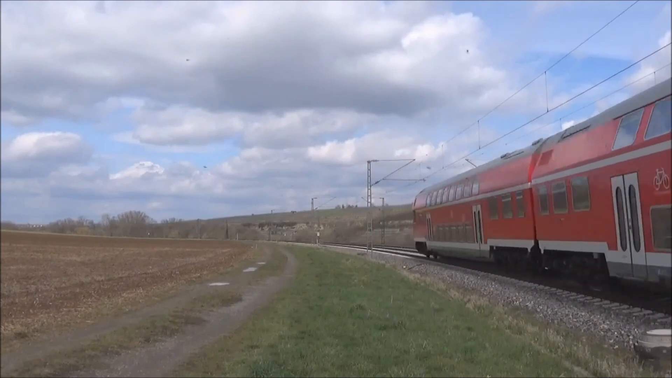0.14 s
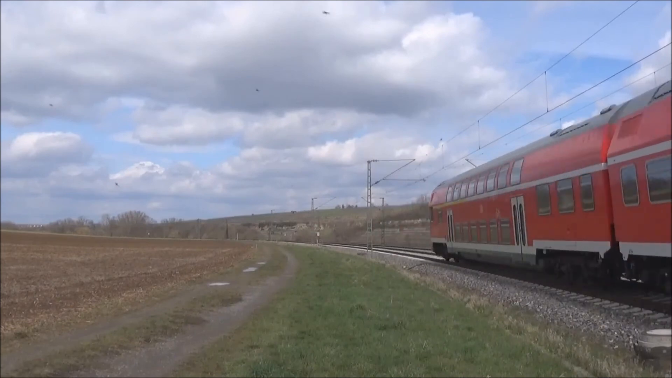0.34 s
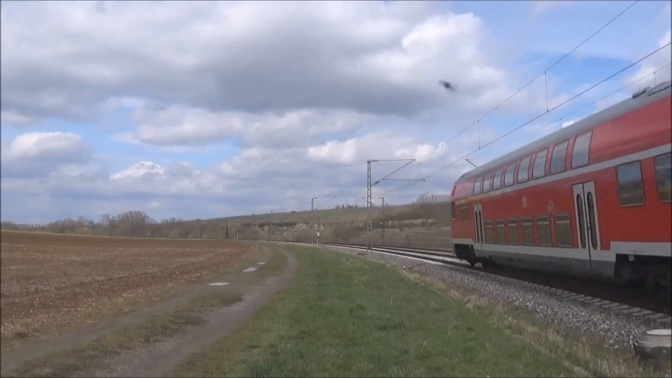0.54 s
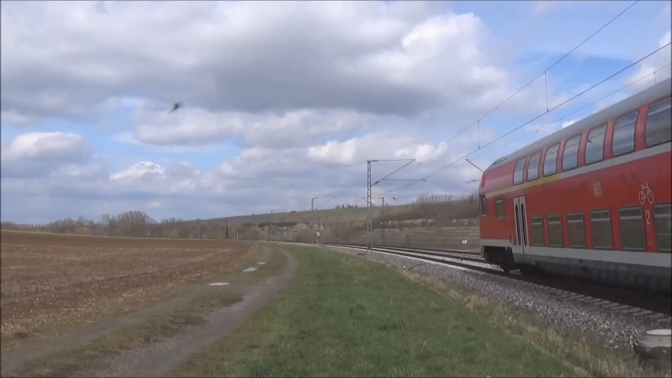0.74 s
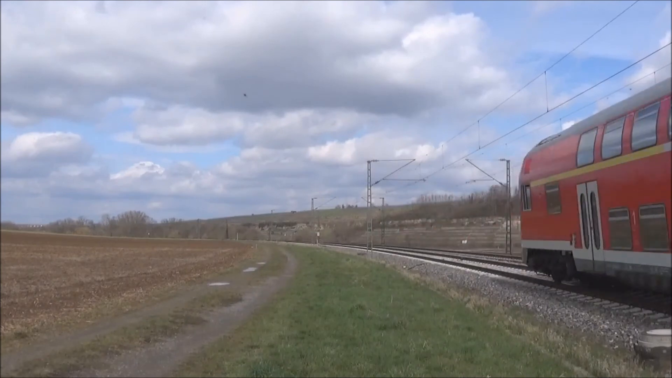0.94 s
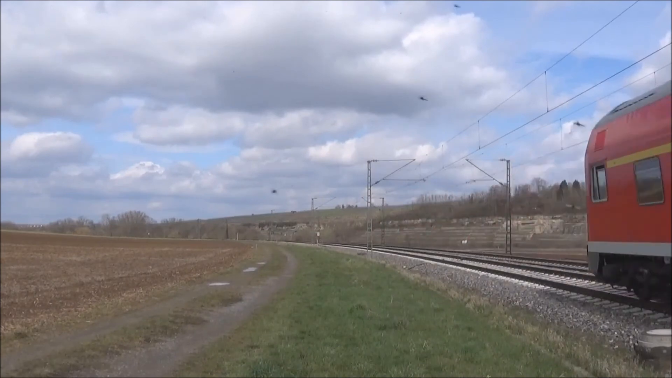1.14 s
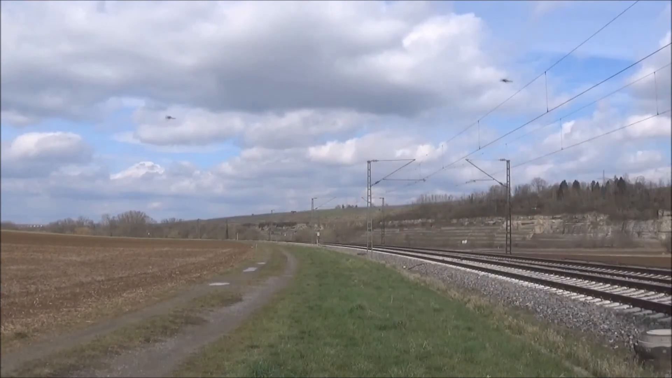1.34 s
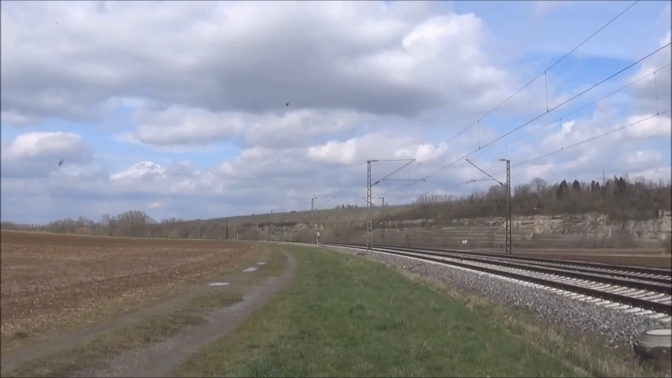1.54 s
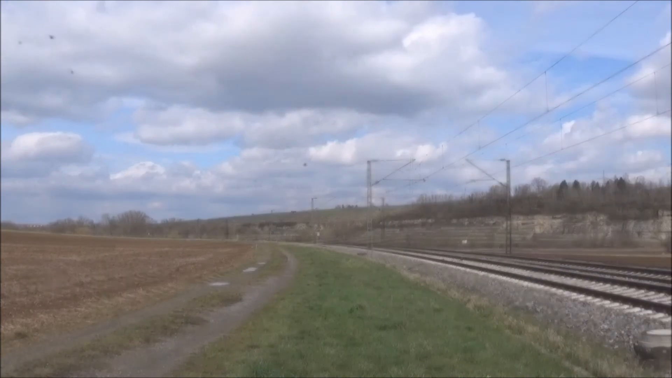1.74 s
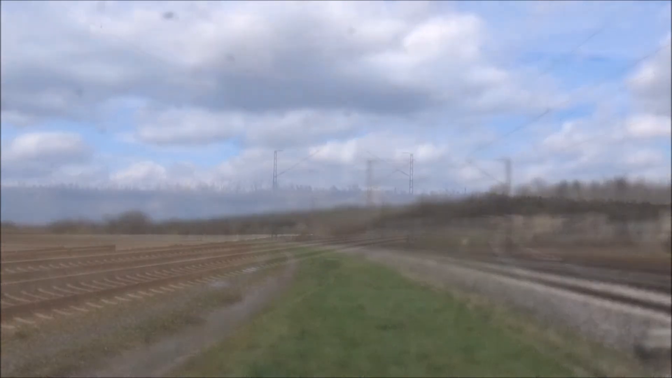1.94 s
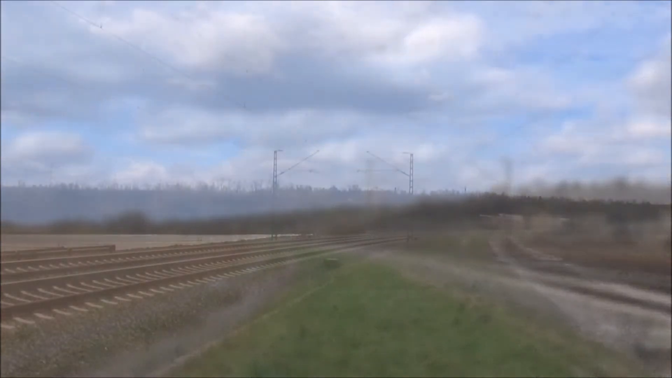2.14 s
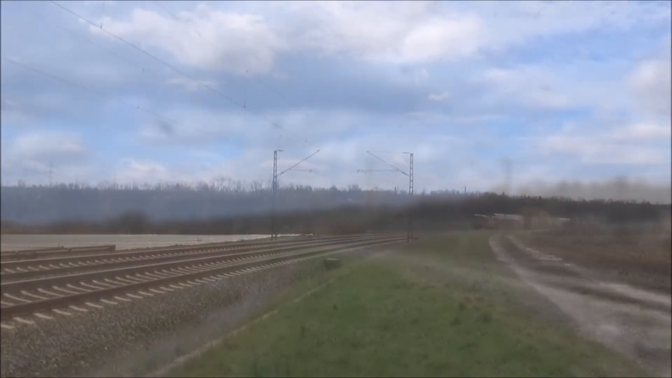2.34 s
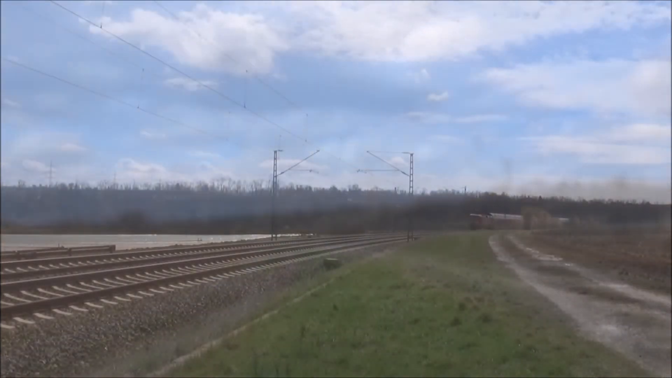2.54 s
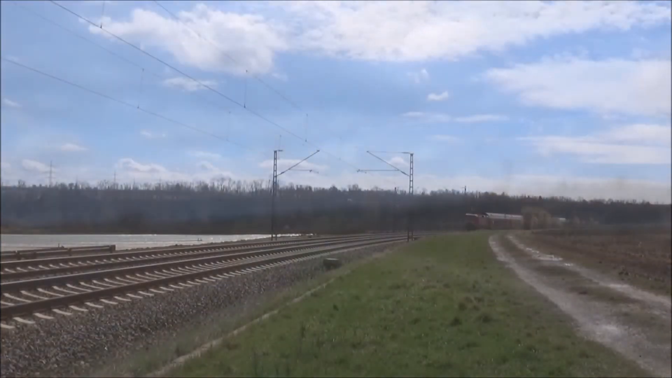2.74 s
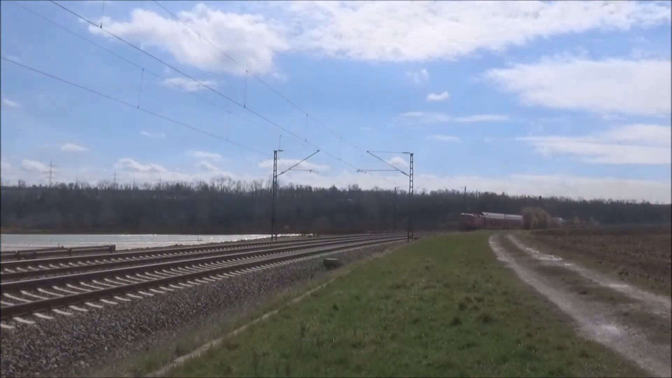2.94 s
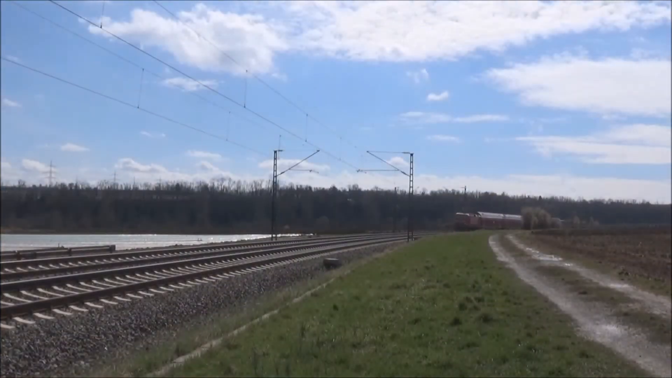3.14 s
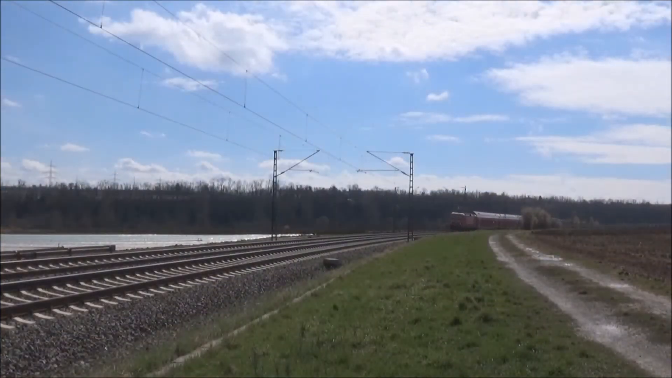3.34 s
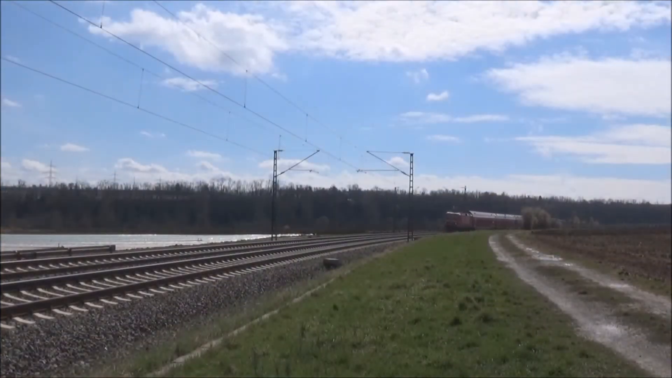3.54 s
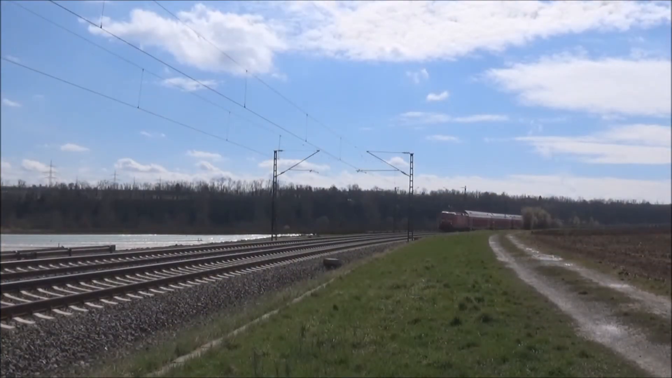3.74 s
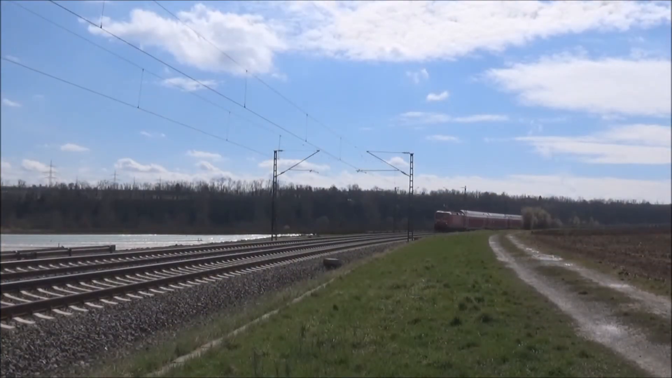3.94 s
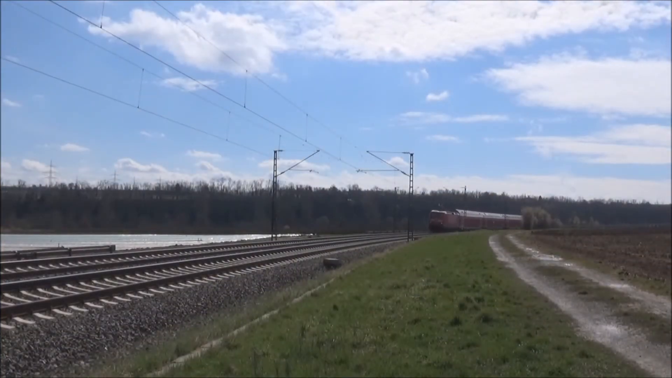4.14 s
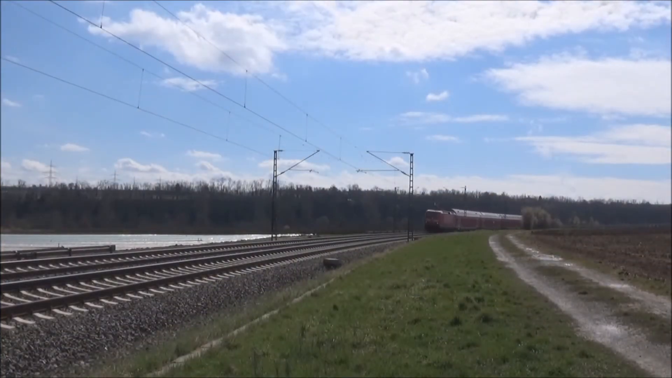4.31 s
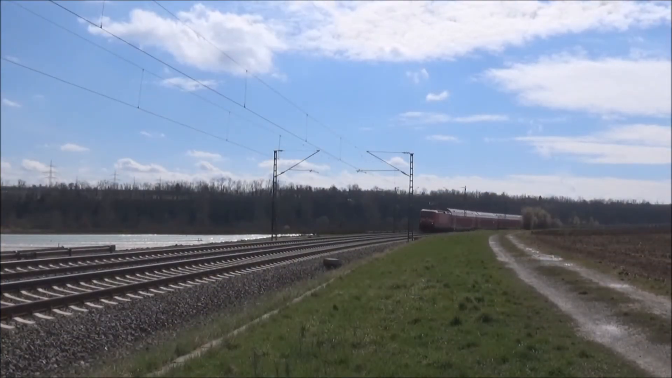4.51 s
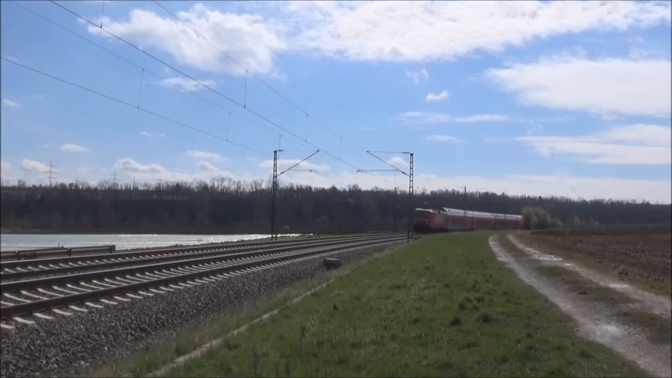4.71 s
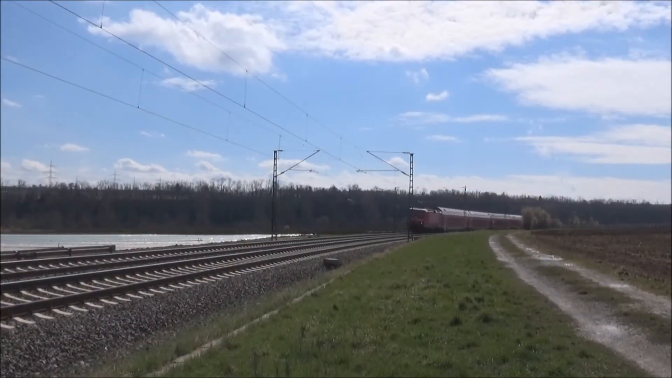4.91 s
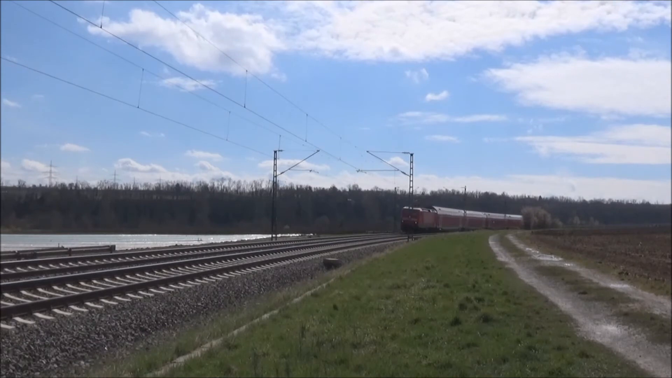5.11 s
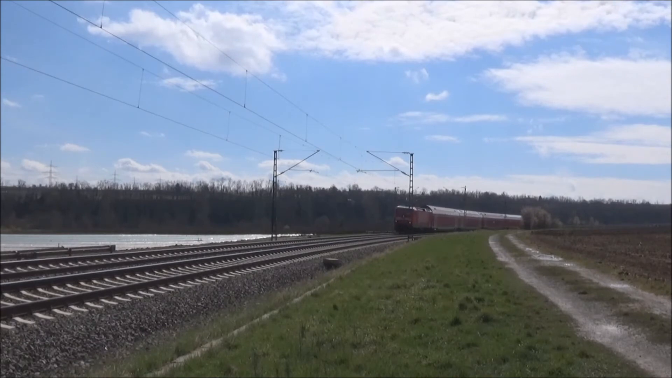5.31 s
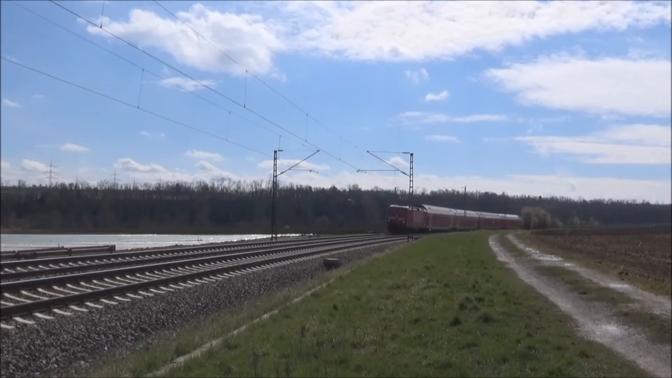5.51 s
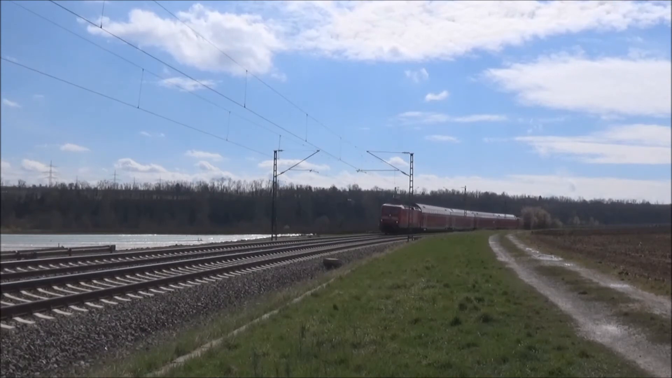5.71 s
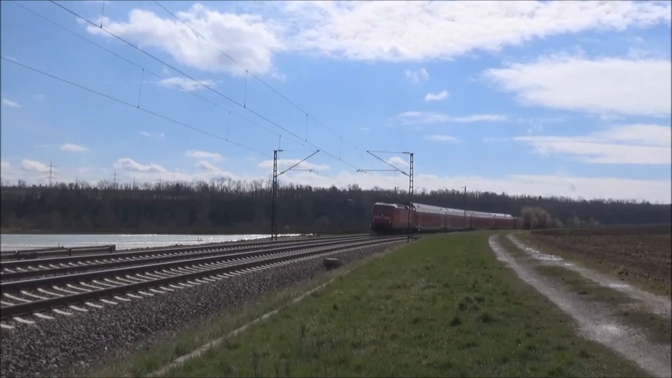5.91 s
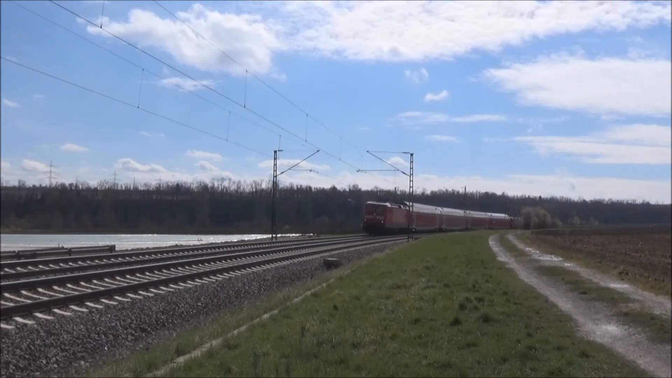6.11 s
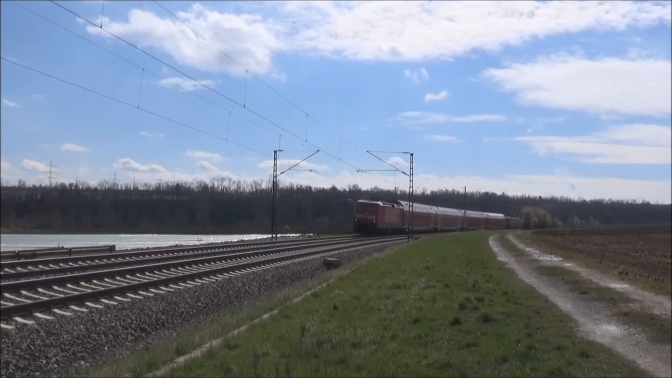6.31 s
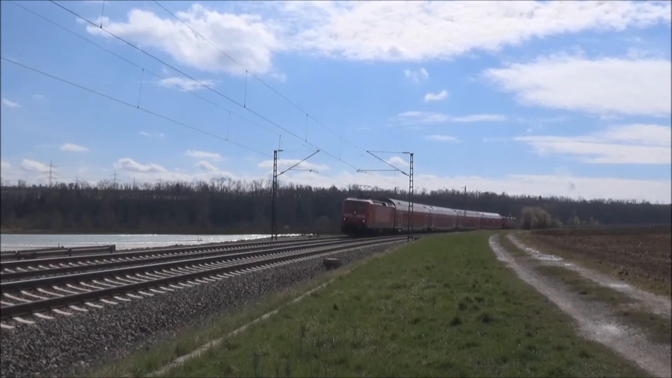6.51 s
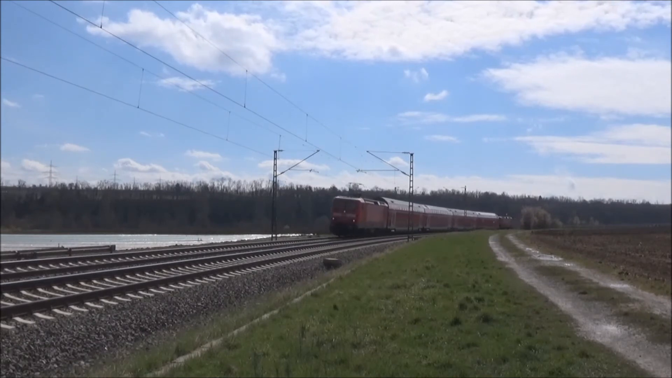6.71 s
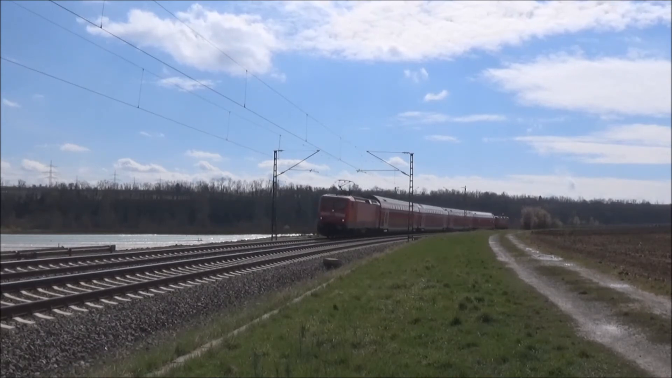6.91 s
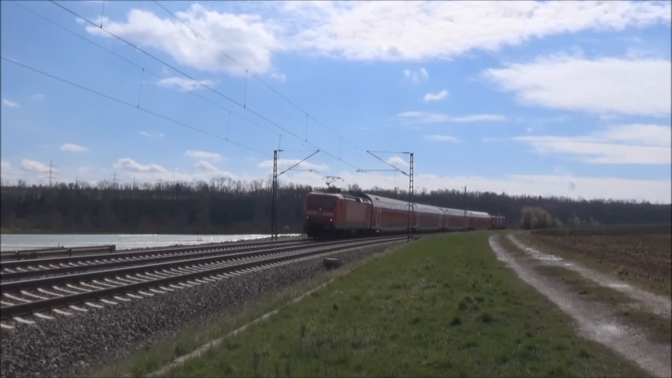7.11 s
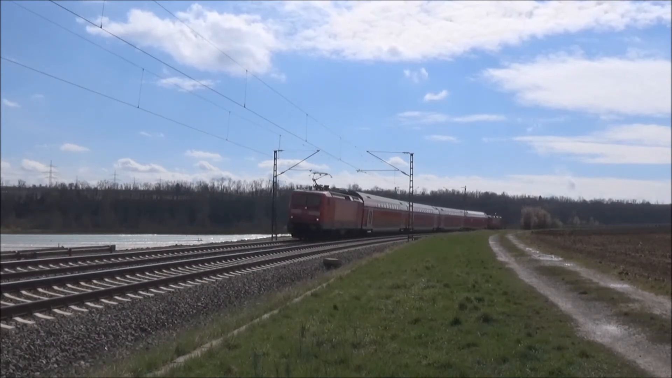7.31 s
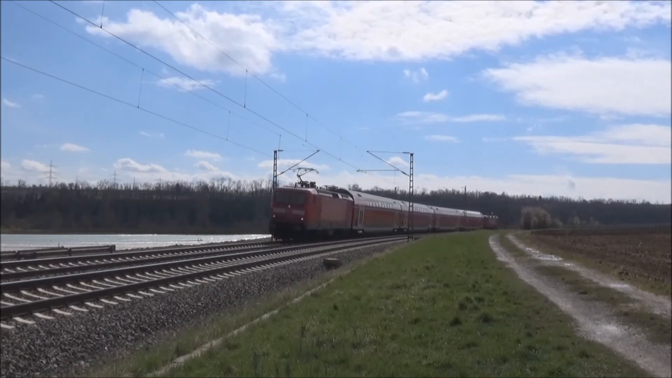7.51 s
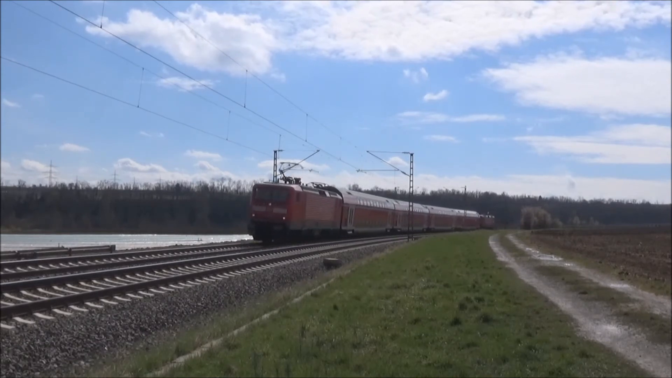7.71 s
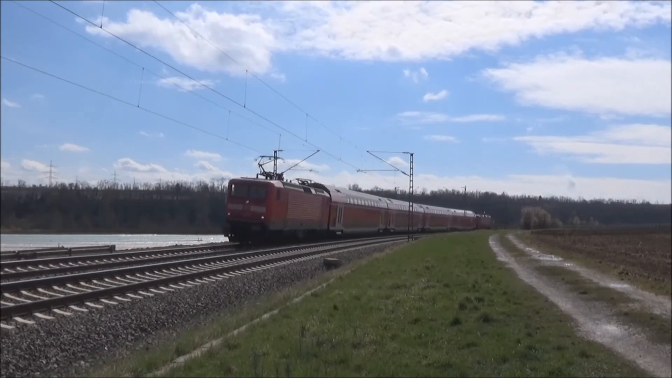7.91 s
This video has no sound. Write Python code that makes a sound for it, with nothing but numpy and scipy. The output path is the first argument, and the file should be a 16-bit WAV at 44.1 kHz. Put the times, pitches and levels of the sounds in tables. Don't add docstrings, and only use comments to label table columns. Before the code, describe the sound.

A passenger train rolls past close on the right, with a broad roar, wheel hiss and falling whine. Its tail recedes, a flat wheel thumping quickly. Quiet open land follows, then wind buffets the camera's stereo microphone while rails sing and chirp. A high metallic squeal takes hold, a stone snaps, and a second train's distant roar slowly grows.

```python
import sys
import numpy as np
from scipy import signal
from scipy.fft import rfft, irfft, next_fast_len
from scipy.io import wavfile
from scipy.ndimage import uniform_filter1d, map_coordinates

SR = 44100
rng = np.random.default_rng(int(sys.argv[2]) if len(sys.argv) > 2 else 0)


def inscribe(sig):
    pcm = np.round(np.clip(np.atleast_2d(sig).T, -1, 1) * 32767)
    wavfile.write(sys.argv[1], SR, pcm.astype(np.int16))


def how_loud(loudness_db):
    steps = np.asarray(loudness_db, float) / 20
    return 10 ** steps


N = 350595
SIZE = next_fast_len(N + 8192)
HZ = np.fft.rfftfreq(SIZE, 1 / SR)
T = np.arange(N) / SR


def unit(x):
    return x / np.sqrt(np.mean(x ** 2) + 1e-20)


def along(points):
    f, *cols = np.transpose(points)
    return [np.interp(np.log(HZ + 1), np.log(f), c) for c in cols]


def curves(rows):
    s, *cols = np.transpose(rows)
    return [np.interp(T, s, c) for c in cols]


def fade(start, end):
    return np.clip((T - start) / (end - start), 0, 1)


def swells(rows):
    return sum(np.c_[list(dbs)] * np.exp(-((T - s) / half) ** 2) for s, half, *dbs in rows)


def wobble(rate):
    return map_coordinates(rng.standard_normal(int(N * rate / SR) + 4), [np.arange(N) * rate / SR])


def filtered(x, gain):
    return irfft(rfft(x, SIZE) * gain, SIZE)[:, :N]


def patchy(patchy_db, bins):
    z = signal.stft(rng.standard_normal((2, N + 512)), nperseg=512)[2]
    patches = uniform_filter1d(rng.standard_normal(z.shape[1:]), bins, 0)
    patches = unit(uniform_filter1d(patches, 8, 1))
    noise = signal.istft(z * how_loud(patchy_db * patches), nperseg=512)[1]
    return rfft(noise[:, :N], SIZE)


def placed(pair, gain, pan_db, alike, lead):
    turn = np.arccos(np.clip(alike, -1, 1)) / 2
    mid = pair[0] * gain * np.cos(turn)
    side = pair[1] * gain * np.sin(turn)
    tilt = how_loud(pan_db / 2) * np.exp(.5j * lead)
    x = irfft(np.array([(mid + side) * tilt, (mid - side) / tilt]), SIZE)[:, :N]
    return x / np.std(x.mean(axis=0))


def rush(spectrum, sides, patchy_db):
    return placed(patchy(patchy_db, bins=6), how_loud(along(spectrum)[0]), *along(sides))


def singing(centres, bands, alike, patchy_db):
    width, db, pan_db, lead = np.transpose(bands)[:, :, None]
    power = how_loud(2 * db) / width / (1 + ((HZ - np.c_[centres]) / width) ** 2 / 2) ** 3
    total = power.sum(axis=0)
    share = power / total
    pan_db, lead = (share * pan_db).sum(axis=0), (share * lead).sum(axis=0)
    return placed(patchy(patchy_db, bins=3), np.sqrt(total), pan_db, alike, lead)


def bursts(events, hz, length, delay):
    x = np.zeros(N)
    for (s, db), (bend, phase) in zip(events, rng.standard_normal((len(events), 2))):
        near = slice(round(s * SR) - 2000, round(s * SR) + 3000)
        u = T[near] - s - delay
        tone = np.sin(2 * np.pi * hz * (1 + 0.011 * bend) * u + phase)
        x[near] += how_loud(db) * np.exp(-(u / length) ** 2) * tone
    return x


# f/Hz, level/dB (per Hz)
FIELD = [(30, -30), (70, -2), (120, -1), (200, -4), (320, 3), (450, -12), (555, -5.5), (700, -15),
         (1200, -33)]
# f/Hz, left-right level/dB, likeness, left lead/rad
FAR_SIDE = [(60, -3, 0.93, 0), (500, 1.5, 0.98, 0), (3000, 0, 0.88, 0.0052), (6860, 3, 0.45, 0),
            (9450, -6, 1, 0), (11000, -3, 0.98, 0)]


def field():
    x = how_loud(-52 + 1.3 * wobble(4.7)) * rush(FIELD, FAR_SIDE, patchy_db=1.5)
    deep = filtered(x, 1 / (1 + (HZ / 170) ** 4))
    lull_db = swells([(3.2, 0.2, -8)])[0]
    purr = how_loud(-64) * (1 - fade(3.4, 3.6)) * singing([560], [(14, 0, 1, 0)], alike=.9, patchy_db=0.0)
    return x + (how_loud(lull_db) - 1) * deep + purr


# t/s, half length/s, f/Hz, glide/(Hz/s), level/dB
WHINE = [
    (.3, 0.64, 1400, -230, -30.5),
    (.75, 0.36, 1500, -200, -36),
    (.58, 0.18, 690, -150, -32),
    (1.3, 0.2, 715, -82, -29.5),
]


def whine():
    x = np.zeros(N)
    rough = wobble(69.94) + 1j * wobble(70.3)
    for s, half, hz, glide, db in WHINE:
        near = slice(max(round((s - 3 * half) * SR), 0), round((s + 3 * half) * SR))
        u = T[near] - s
        tone = np.exp(2j * np.pi * (hz + glide * u / 2) * u)
        x[near] += how_loud(db - (u / half) ** 2 * 7.9) * np.real(rough[near] * tone)
    return x


# t/s, peak level/dB
THUMPS = [(1.765, -18), (1.867, -30), (1.97, -18), (2.073, -17.5), (2.176, -18.5), (2.281, -21),
          (2.383, -25.5), (2.477, -28), (2.585, -28), (2.689, -32), (2.793, -34), (2.884, -43.5)]


def flat_wheel():
    flat = np.array(THUMPS) - [0, 2.5]
    ground = bursts(flat, hz=170, length=0.01, delay=0.0344)
    ground += bursts(flat, hz=173, length=0.021, delay=0.069)
    knock = bursts(flat, hz=223, length=0.0055, delay=0.0081)
    click = bursts(flat, hz=347, length=0.0048, delay=0.00696)
    return how_loud(-12.5) * ground + knock + how_loud(-11) * click


# f/Hz, level/dB (per Hz)
BOGIE = [(40, -34), (80, -13.5), (180, 1.5), (400, -2.5), (700, -5.5), (1400, -30.5)]
RAIL = [(300, -20), (600, 1.5), (750, -1), (900, 2.5), (1350, 2.5), (1600, -4), (2300, -28.5)]
WHEEL = [(1200, -28), (1750, 0.5), (2300, 1), (2550, -3), (2800, 0.5), (3200, -3), (4200, -26)]
RUSH = [(2400, -19), (3500, 0), (5000, 0), (6000, 0.5), (7000, -4.5), (8500, -20), (10000, -36)]
AIR = [(5500, -26), (7500, 5.5), (9000, 1.5), (10500, -3), (11000, -25)]
# f/Hz, left-right level/dB, likeness, left lead/rad
NEAR_SIDE = [(60, 1.5, .85, 0.17), (204, -3.5, 0.91, 0.11), (770, -12, 0.69, -0.38), (1790, -9, 0.4, 1),
             (3470, -4.5, 0.71, 0.87), (6000, -4, 0.69, 0.18), (8300, -5, 0.39, 0.13),
             (9500, 4.5, 0.62, -.3), (10800, 0, 1, 0.07)]
# t/s, loss/dB
FADING = [(0.0, -1), (.4, 0), (1.45, -1), (1.85, -4.5), (2.15, -11.5), (2.35, -20), (2.6, -24.5),
          (2.85, -30.5), (3.3, -38)]
# level alongside/dB, share of the loss, lead/s, sag/(dB/s) once the last car nears
PARTS = [
    (-22.5, 1.09, .001, 0.3),
    (-21, 0.7, .001, 8),
    (-24.5, 0.95, 0.23, 7),
    (-26, 1.05, 0.2, 0.5),
    (-37, 0.8, 0.15, 1),
]
# t/s, half length/s, bogie level/dB, wheel level/dB, rush level/dB
AXLES = [
    (.2, .1, 1.5, -2, -1),
    (.4, 0.11, -3.2, -1.5, 0),
    (.68, 0.25, -0.7, 1.5, 0.5),
    (1.28, 0.11, 1, -1, 0.9),
    (1.46, 0.11, -0.1, 4, 1.8),
    (1.62, .06, -0.2, 1, -1.5),
    (1.8, 0.11, 0, 1.2, 2),
]


def passing():
    last_car_s, tail_s = 0.64, 1.53
    sagging = np.clip(T, last_car_s, tail_s) - last_car_s
    loss_s, loss_db = np.transpose(FADING)
    bogie_db, rail_db, wheel_db, rush_db, hiss_db = [
        db + share * np.interp(T + lead, loss_s, loss_db) - sag * sagging for db, share, lead, sag in PARTS]
    heavy_db, bright_db, blow_db = swells(AXLES)
    flutter_db = 1.5 * np.exp(-((T - 0.68) / 0.28) ** 4) * np.cos(2 * np.pi * 10.6 * (T - .78))
    blow_db = blow_db + flutter_db
    shake = wobble(13.63)
    x = how_loud(bogie_db + heavy_db + .5 * shake) * rush(BOGIE, NEAR_SIDE, patchy_db=1.0)
    x += how_loud(rail_db + .5 * shake) * rush(RAIL, NEAR_SIDE, patchy_db=2.0)
    x += how_loud(wheel_db + bright_db + 0.26 * shake) * rush(WHEEL, NEAR_SIDE, patchy_db=1.5)
    x += how_loud(rush_db + blow_db + 0.24 * wobble(14.8)) * rush(RUSH, NEAR_SIDE, patchy_db=1.36)
    x += how_loud(hiss_db + blow_db) * rush(AIR, NEAR_SIDE, patchy_db=2.0)
    x *= 1 - fade(2.62, 3.36)
    return x + flat_wheel() * how_loud([[-1.5], [1.5]]) + whine() * how_loud([[-6], [3.5]])


# t/s, roar level/dB
NEARING = [(2.4, -63.5), (3.47, -59.5), (4.33, -51.5), (4.72, -47.5), (5.15, -47.5), (6.09, -45),
           (6.57, -41.5), (7.01, -42), (7.53, -37), (7.7, -35), (7.95, -35.5)]
MID_ROAR_DB = -46
# f/Hz, level/dB (per Hz)
ROAR = [(900, -40), (1700, 2.5), (2900, 1.5), (4000, -1), (5400, -5.5), (6500, -11), (8000, -13)]
HISS = [(4500, -17), (6500, -3), (7300, -15), (9300, -2), (10100, -2), (10650, -34), (10800, 0.5),
        (11000, -9.5)]
DRONE = [(50, -25), (150, -6.5), (240, 0.5), (320, 8.5), (420, -7), (540, 7), (620, -2), (800, 6),
         (1500, 0), (2200, -16.5)]
# f/Hz, then width/Hz, level/dB, left-right level/dB, left lead/rad
DISC_HZ = [4440]
DISC = [(70, 0, 1, 0)]


def nearing():
    roar_db, = curves(NEARING)
    hiss_db = roar_db + 3.0 + 0.59 * (roar_db + 41.5)
    drone_db = -43 + 0.81 * (roar_db - MID_ROAR_DB) + 0.3 * wobble(4.02)
    disc_db = -50 + 1.5 * wobble(6) - 6 * fade(6.85, 7.05)
    x = how_loud(roar_db + 4.5) * rush(ROAR, FAR_SIDE, patchy_db=2.0)
    x += how_loud(hiss_db) * rush(HISS, FAR_SIDE, patchy_db=0.0)
    x += how_loud(drone_db) * fade(3.08, 3.18) * rush(DRONE, FAR_SIDE, patchy_db=2.0)
    x += how_loud(disc_db) * fade(6.6, 6.68) * singing(DISC_HZ, DISC, alike=.9, patchy_db=1.5)
    return x * fade(1.6, 3.2)


# t/s, peak level/dB
CHIRPS = [(3.564, -43), (3.7241, -45), (3.772, -41), (3.8244, -38), (3.8613, -35), (3.8997, -40),
          (3.9865, -38), (4.0543, -41), (4.0783, -41), (4.1631, -38), (4.2232, -40), (4.2674, -27),
          (4.3457, -32), (4.421, -41), (4.4509, -43), (4.4779, -35), (4.5103, -28), (4.6445, -38),
          (4.7373, -38), (4.7827, -37), (4.8226, -28), (4.8795, -29)]
TICKS = [
    (2.99, -47),
    (2.58, -52),
]


def flange_chirps():
    x = how_loud(0.5) * bursts(CHIRPS, hz=8450, length=0.0017, delay=0.003)
    x += how_loud(-6) * bursts(CHIRPS, hz=8000, length=.0014, delay=.005)
    return x + bursts(TICKS, hz=8300, length=.0012, delay=.002)


# t/s, hum level/dB
LOAD = [(2.6, -52), (2.92, -48), (3.45, -44), (4.25, -38.5), (4.69, -39.5), (4.88, -36), (5.0, -37.5),
        (5.18, -37), (5.47, -35.5), (5.74, -38), (6.25, -32), (6.46, -31), (6.67, -38.5), (7.07, -36),
        (7.41, -36.5), (7.61, -36.5), (7.78, -34), (7.95, -43)]
# t/s, half length/s, flange, web, head level/dB
WAKE = [
    (2.25, 0.3, 3, 8, 6),
]
# t/s, half length/s, flange, web, head level/dB
SLIPS = [(4.9, 0.016, 1, 5, -1), (4.98, 0.015, -14, -12, -12), (5.03, .015, 1, -3, 3),
         (5.27, .025, 3.5, 5, 0), (5.77, .03, 1.5, -1, 4), (5.98, .08, -7, -2.5, 0),
         (6.13, 0.076, -0.5, 3, 0), (6.7, 0.22, 1.5, -4.5, 0.5), (6.94, 0.096, 0.5, -0.5, 3),
         (7.11, 0.071, -5.5, -3, -2.5), (7.57, 0.065, .5, 0.5, 2.5), (7.66, .08, -1, 3, -1),
         (7.94, 0.054, 2, -4, 1.5)]
# centres f/Hz, then
# width/Hz, level/dB, left-right level/dB, left lead/rad
HUM_HZ = [990, 1095, 1165, 1310, 1410]
HUM = [(57.6, -10, 8.5, -0.38), (25.3, -6.5, 5.3, -0.033), (46.2, -1.5, 8.6, -0.44), (45, -2.5, 7.5, -0.7),
       (45, -5.5, 11.2, -0.64)]
RING_HZ = [2305, 2365, 2860]
RING = [(44, 3.5, 6, -.3), (55, -2, 2, -0.13), (83.333, -5, 1, 0.032)]
EARLY_WEB_HZ = [5800, 5930, 6050]
EARLY_WEB = [(80, -4.5, 8, -1.4), (60, 2.5, 6, -1.6), (60, -4, 6, -1.6)]
WEB_HZ = [5800, 5945, 6047, 6130]
WEB = [(90, -6, 8.5, -1.1), (55, 0.5, 6.1, -1.94), (50, 2, 6, -1.5), (70, -18, 5.4, -2)]
EARLY_FLANGE_HZ = [7780, 8200, 8480]
EARLY_FLANGE = [(170, 0, -7, -4), (260, -4, -13, 3.5), (110, -11, -10, 1)]
SQUEAL_HZ = [6700, 7078, 7350, 7770, 8200, 8462, 8540, 8680, 9200]
SQUEAL = [(350, -16, 9, -2.5), (30, -28, 13, 1), (150, -6, 4.5, -3), (170, -9, -16, -5),
          (250, -7.5, -28.5, -4.5), (35, -4.5, -17, 3.5), (70, -0.5, -13, -4), (100, -3, -1, 0),
          (350, -11, -10, 1.5)]
EARLY_HEAD_HZ = [9680, 9960, 10400, 11000]
EARLY_HEAD = [(30, 4, -4, 0), (70, -5, 4, 0), (30, -10, 0, 0), (60, -9.5, -1, 0)]
HEAD_HZ = [9850, 10027, 10170, 10465, 10990]
HEAD = [(170, -3, -2, 0), (50, -2.5, -1, 0), (120, -6.5, 1, 0), (60, -7.5, -5, 0), (45, -12, -0.5, 0)]


def rails():
    (hum_db,), (roar_db,) = curves(LOAD), curves(NEARING)
    load, near = hum_db + 40, roar_db - MID_ROAR_DB
    ring_db = -46 + 0.6 * load + 0.57 * near
    bite_s = 4.86
    caught = fade(bite_s, bite_s + 0.021)
    creep_db = np.c_[[-50, -50.5, -51]] + np.c_[[1.2, 1, 1.2]] * load + swells(WAKE)
    squeal_db = np.c_[[-30, -39.5, -38.5]] + np.c_[[.05, 0.059, 0.63]] * near + swells(SLIPS)
    flange_db, web_db, head_db = creep_db + caught * (squeal_db - creep_db)
    bite = caught * (1 - (1 - 0.89) * fade(bite_s, N / SR))
    loose = 1 - bite
    grip = 0.4 * wobble(30)
    x = how_loud(hum_db + 0.5 + 0.62 * wobble(25)) * singing(HUM_HZ, HUM, alike=0.86, patchy_db=1.36)
    x += how_loud(ring_db + 1.95 * wobble(14)) * singing(RING_HZ, RING, alike=0.7, patchy_db=1.0)
    early_web = singing(EARLY_WEB_HZ, EARLY_WEB, alike=1.0, patchy_db=2.5)
    x += how_loud(web_db + 1.1 * wobble(12)) * loose * early_web
    x += how_loud(web_db + grip + 0.79 * wobble(9)) * bite * singing(WEB_HZ, WEB, alike=0.93, patchy_db=1.0)
    early_flange = singing(EARLY_FLANGE_HZ, EARLY_FLANGE, alike=0.92, patchy_db=-3.5)
    x += how_loud(flange_db + 1.2 * wobble(40)) * loose * early_flange
    x += how_loud(flange_db + grip) * bite * singing(SQUEAL_HZ, SQUEAL, alike=0.98, patchy_db=1.5)
    early_head = singing(EARLY_HEAD_HZ, EARLY_HEAD, alike=0.99, patchy_db=1.5)
    x += how_loud(head_db + 1.2 * wobble(12)) * loose * early_head
    x += how_loud(head_db + grip) * bite * singing(HEAD_HZ, HEAD, alike=0.97, patchy_db=2.1)
    return x * fade(1.8, 2.0) + flange_chirps() * how_loud([[-12], [3]])


# f/Hz, level/dB (per Hz)
BUFFET = [(25, -47), (60, -19), (110, -3.5), (170, -0.5), (300, -1.5), (500, -9.5), (900, -19), (2000, -44)]
# f/Hz, left-right level/dB, likeness, left lead/rad
PORTS = [(60, -3, 0.99, 0), (150, -1.5, 0.66, 0), (350, -3, 0.37, 0), (715, -2, -0.47, 0)]
# t/s, hold/s, level/dB, left-right level/dB
PUFFS = [(3.38, .05, -58, .5), (3.444, 0.3, -39, 1.5), (3.86, .12, -33, 2.5), (4.09, 0.089, -31.5, 3.5),
         (4.205, 0.2, -28.5, 2.5), (4.49, 0.062, -28, 3), (4.67, 0.13, -26, 3), (4.85, 0.056, -32, -1),
         (5.053, 0.53, -37.5, 2), (5.81, 0.013, -33.5, 3), (5.906, 0.27, -39, 1), (6.256, 0.47, -41, 2.5),
         (6.86, .04, -50, .3), (7.0, 0.66, -49.5, 3), (7.755, 0.018, -47, .3), (7.88, .03, -59, 1)]
# t/s, peak level/dB, f/Hz
KNOCKS = [(3.441, -32, 191), (3.68, -32, 342), (3.77, -30, 261), (3.848, -23.5, 210), (3.938, -27.5, 188),
          (4.075, -26, 152), (4.26, -19, 170), (4.49, -18, 266), (4.929, -25, 248), (5.227, -28, 272),
          (5.359, -25, 237), (5.662, -31, 240), (5.817, -24, 231), (6.054, -27, 318)]


def gust():
    power = 0
    for s, hold, db, pan_db in PUFFS:
        rise_db = 296 * np.clip(s - T, 0, 1)
        fall_db = 77 * np.clip(T - s - hold, 0, 1)
        power = power + how_loud(2 * (db - rise_db - fall_db)) * how_loud([[pan_db], [-pan_db]])
    lumps = how_loud(1.9 * np.array([wobble(45), wobble(45)]))
    buffet = unit(lumps * rush(BUFFET, PORTS, patchy_db=0.53))
    slaps = sum(bursts([(s, db - 4.5)], hz=hz, length=0.0075, delay=0.01204) for s, db, hz in KNOCKS)
    return how_loud(-0.5) * np.sqrt(power) * buffet + slaps


# t/s, peak level/dB
SNAP = [
    (5.0091, -13),
]
# f/Hz, level/dB, 60 dB decay/s
STONE = [(860, -2.5, 0.018), (1520, -3, 0.0092), (2610, -3.5, .008), (3430, -11, .008), (4100, -1.5, 0.011),
         (5000, -6, .01), (6300, -14, .006)]


def snap():
    x, t = np.zeros(N), np.arange(SR // 20) / SR
    for s, db in SNAP:
        ring = 0
        for k, (hz, level, t60) in enumerate(STONE):
            ring = ring + (-1) ** k * how_loud(level - 60 * t / t60) * np.sin(2 * np.pi * hz * t)
        grit = how_loud(-5.0 - 60 * t / .022) * np.gradient(rng.standard_normal(len(t)))
        crack = how_loud(-4.0 - 60 * t / .005) * rng.standard_normal(len(t))
        x[round(s * SR):][:len(t)] += how_loud(db - 5.0) * (ring + grit + crack)
    return x


# t/s, half length/s, f/Hz, width/Hz, level/dB
SHADES = [(1.6, .1, 8300, 700, -5), (1.75, 0.087, 3200, 980, -1.5), (1.91, 0.11, 3600, 1300, -4),
          (1.57, .1, 9900, 400, 7), (1.72, .08, 5500, 1200, 3), (2.32, .25, 4500, 900, -4),
          (2.12, .2, 9000, 1500, -3.5), (2.33, .3, 590, 120, -4.5), (2.32, .2, 740, 110, 4),
          (0.084, .15, 870, 150, -2), (1.27, 0.13, 380, 80, -3), (7.8, .15, 3500, 600, -4),
          (5.5, .25, 3600, 800, 2), (7.3, .12, 3100, 700, -2.5), (7.85, 0.12, 370, 100, -5),
          (3.85, .2, 6900, 700, 5), (7.8, .12, 2500, 250, 4), (0.72, 0.14, 560, 90, 3),
          (0.45, 0.14, 180, 32, 5.5), (1.03, 0.16, 1120, 180, 2.5), (1.08, 0.11, 2400, 350, -3)]


def shaded(x):
    y = x.copy()
    for s, half, hz, width, db in SHADES:
        band = filtered(x, np.exp(-((HZ - hz) / width) ** 2))
        y = y + (how_loud(db * np.exp(-((T - s) / half) ** 2)) - 1) * band
    return y


def scene():
    return shaded(passing() + nearing()) + rails() + gust() + field() + snap()


def band_limit(x):
    return signal.sosfilt(signal.butter(12, 11950, fs=SR, output="sos"), x)


def record(dry):
    treble_db = -np.clip(HZ - 11030, 0, 240) / 2
    bass = HZ / np.hypot(HZ, 45)
    kept = filtered(dry, how_loud(treble_db) * bass)
    kept = kept / (1 + np.abs(kept / .95) ** 4) ** (1 / 4)
    return band_limit(kept)


dry = scene()
out = record(dry)
inscribe(out)
```